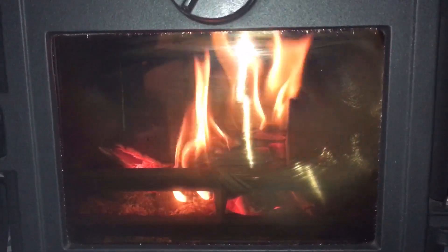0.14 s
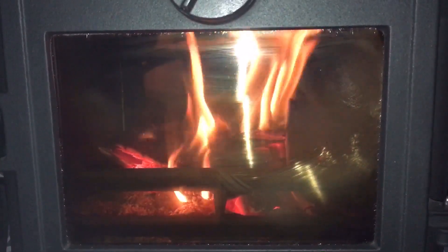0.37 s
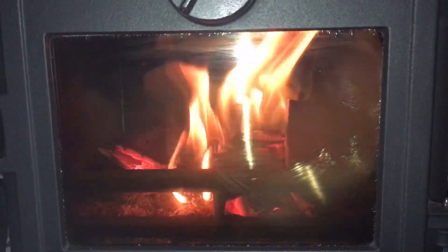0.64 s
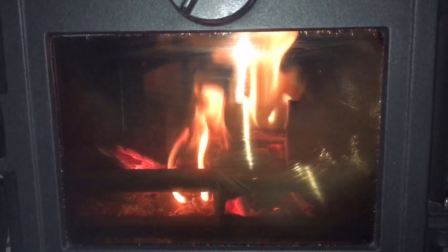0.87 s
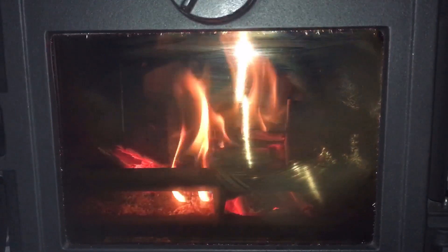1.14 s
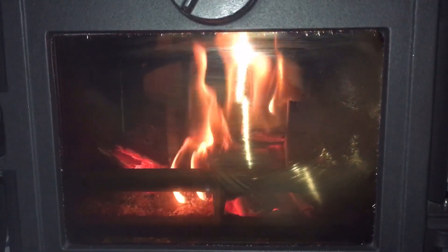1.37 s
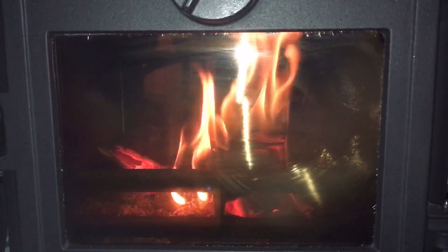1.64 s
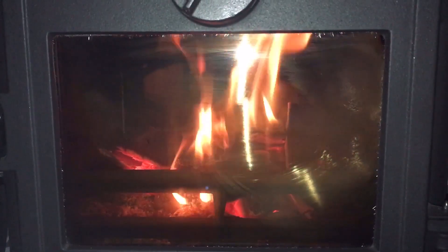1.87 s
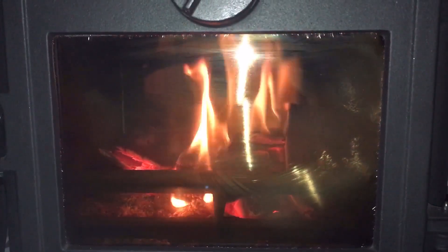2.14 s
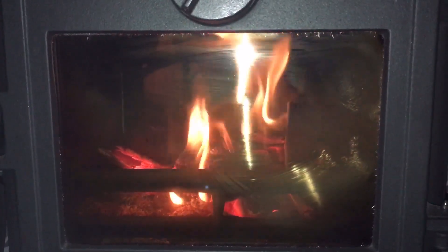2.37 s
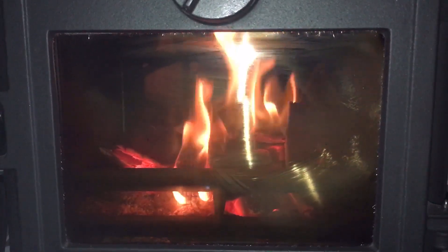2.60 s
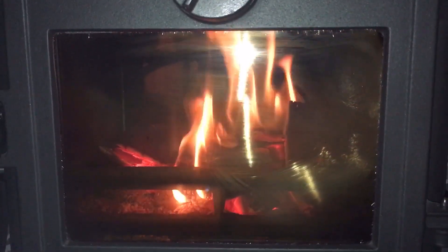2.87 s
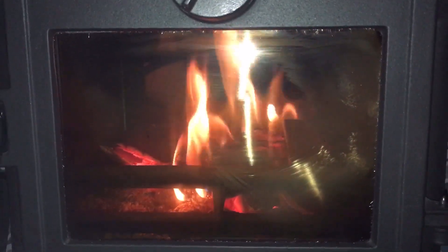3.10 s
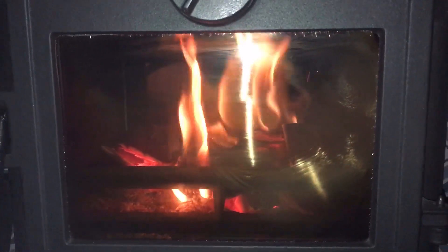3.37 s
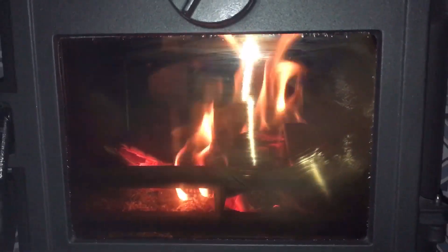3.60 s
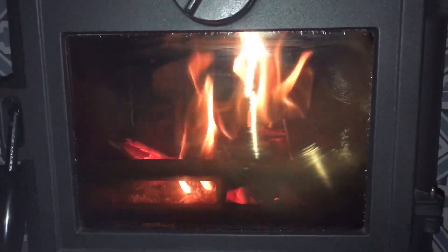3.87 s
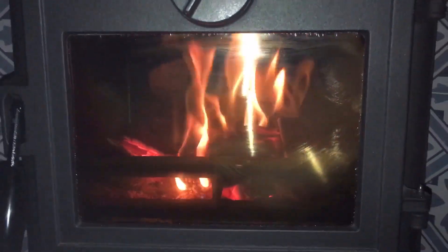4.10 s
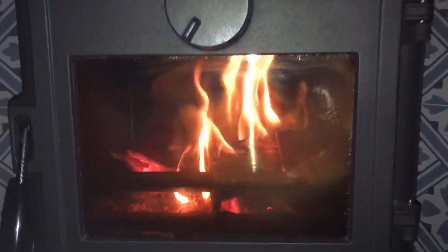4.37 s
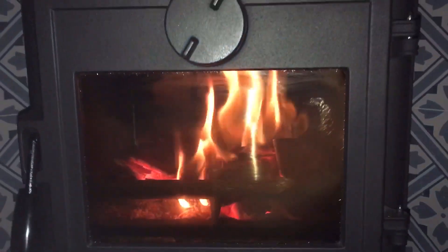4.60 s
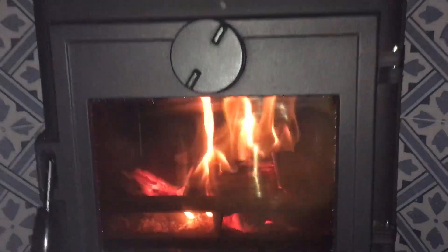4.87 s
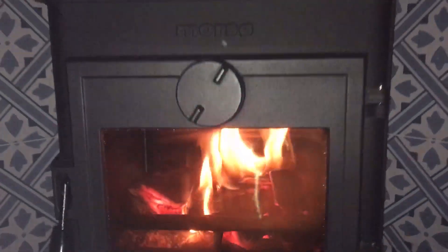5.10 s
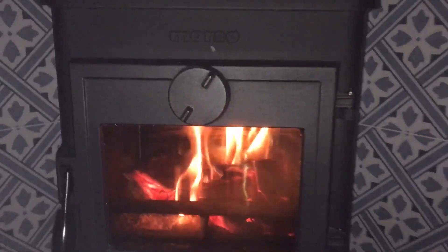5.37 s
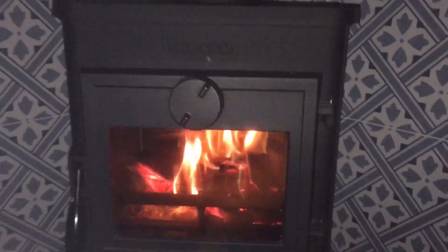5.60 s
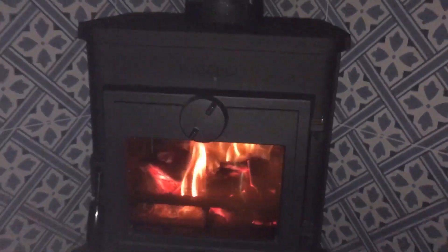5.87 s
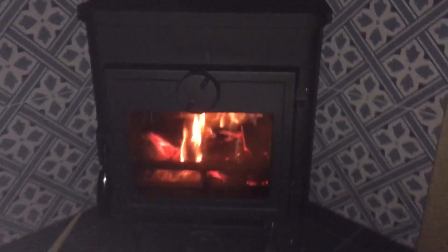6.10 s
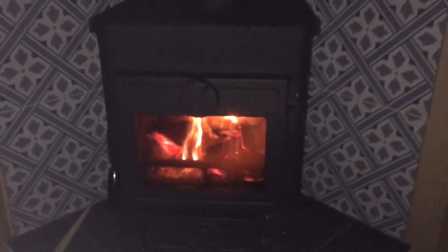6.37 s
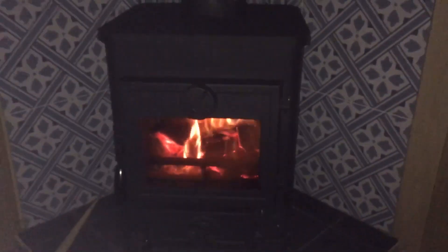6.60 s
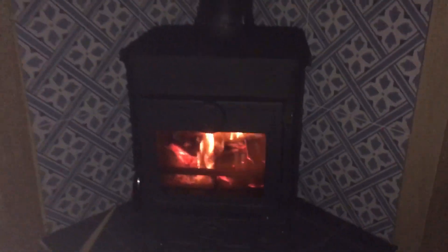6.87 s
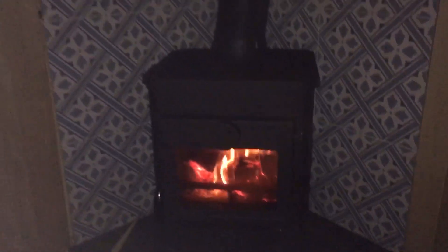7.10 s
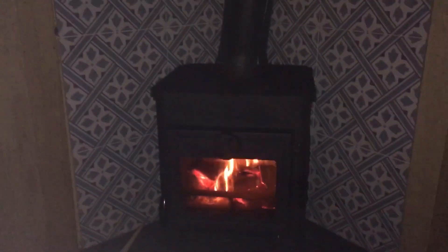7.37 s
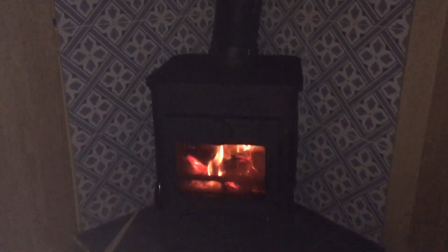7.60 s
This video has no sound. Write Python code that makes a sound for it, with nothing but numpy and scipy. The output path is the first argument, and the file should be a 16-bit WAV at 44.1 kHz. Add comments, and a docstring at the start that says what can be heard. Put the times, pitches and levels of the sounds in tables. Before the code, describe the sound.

Claws drag over cloth on a hollow floor in uneven strokes, with dull thumps, faint ticks, one stove crack and a small click.

```python
"""In a quiet room, near a burning iron stove, a dog paws at its bedding.
Each stroke drags claws over cloth and shakes the hollow floor: random clicks ring resonances.
Some strokes bring a thump, a soft push on floor and bed. Stove and claws tick faintly (short noise
sprays); the stove cracks once; later something small clicks (rough contacts ringing a few modes).
Draught rumble, a soft roar and microphone hiss, all shaped noise, lie below."""
import sys
import numpy as np
from scipy import signal
from scipy.fft import rfft, irfft
from scipy.io import wavfile
from scipy.ndimage import uniform_filter1d

SR = 44100
rng = np.random.default_rng(int(sys.argv[2]) if len(sys.argv) > 2 else 0)


def master_out(mix):
    """Clip the mix to full scale and print it as 16-bit PCM to the path in sys.argv[1]."""
    frames = np.transpose(np.atleast_2d(mix))
    ceiling = np.clip(frames, -1, 1)
    pcm = np.round(ceiling * 32767).astype(np.int16)
    wavfile.write(sys.argv[1], SR, pcm)


def gain_from_db(level_db):
    """Convert decibel levels to linear amplitude factors (20 dB per decade)."""
    decades = np.asarray(level_db, float) / 20
    return 10 ** decades


N = 340893
STEP = 32   # paw levels are worked out once every 32 samples


def rms_one(x):
    """Scale to rms 1."""
    return x / np.sqrt(np.mean(x ** 2) + 1e-20)


def coloured(points):
    """Noise with the given spectrum, rows of (frequency [Hz], level [dB per Hz]); rms 1."""
    hz, db = np.transpose(points)
    bins = np.linspace(1, SR / 2, N // 2 + 1)
    shape = gain_from_db(np.interp(np.log(bins), np.log(hz), db, left=-60))
    return rms_one(irfft(rfft(rng.standard_normal(N)) * shape, N))


def drift(rate_hz):
    """Slow random wandering: noise smoothed twice; rms 1."""
    r = np.exp(-2 * np.pi * rate_hz / SR)
    noise = rng.standard_normal(N + SR)
    return rms_one(signal.lfilter([1], [1, -2 * r, r * r], noise)[SR:])   # skip the filter's start


def together(a_db, b_db):
    """Gain of two unrelated levels heard at once: their powers add."""
    return np.hypot(gain_from_db(a_db), gain_from_db(b_db))


def band(x, edges_hz):
    """Keep only the band between two frequencies."""
    return signal.sosfilt(signal.butter(2, edges_hz, "band", fs=SR, output="sos"), x)


def resonate(x, peaks):
    """Parallel resonances, signs alternating; rows of (frequency [Hz], width [Hz], level [dB])."""
    out = 0
    for k, (hz, width, db) in enumerate(peaks):
        r = np.exp(-np.pi * width / SR)
        a = [1, -2 * r * np.cos(2 * np.pi * hz / SR), r * r]
        b = [(1 - r * r) / 2, 0, (r * r - 1) / 2]
        out = out + (-1) ** k * gain_from_db(db) * signal.lfilter(b, a, x)
    return out


def placed(hits):
    """One impulse for each row of (time [s], level [dB])."""
    out = np.full(N, 1e-18)
    for s, db in hits:
        out[round(s * SR)] = gain_from_db(db)
    return out


def held(start, length, db, swell_db, rise, fall):
    """Power of gestures, a row each: a steady climb, a hold that may swell, a steady fall."""
    t = np.arange(0, N, STEP) / SR - np.c_[start]
    length = np.c_[length]
    level_db = np.c_[db] + np.c_[swell_db] * np.clip(t / length, 0, 1)
    return gain_from_db(2 * (level_db + rise * np.minimum(t, 0) - fall * np.maximum(t - length, 0)))


def every_sample(coarse):
    """Fill in a curve to one value per sample."""
    return np.interp(np.arange(N) / STEP, np.arange(len(coarse)), coarse)


def level_of(*powers):
    """Summed power of all gestures in dB, one value per sample."""
    total = sum(p.sum(axis=0) for p in powers)
    return every_sample(10 * np.log10(total + 1e-12))


# long strokes: (paw lands [s], length [s], claw rasp on landing [dB], swell until it lifts [dB],
#                weight on floor above rasp [dB], rasp tilt [dB per octave])
LONG_STROKES = [(0.0, .2, -53.5, -1.5, 7, -0.3), (0.541, 0.19, -52.5, -4.5, 7, 0.6),
                (1.519, 0.16, -50, -1.5, 2.5, 1.7), (2.11, 0.21, -46.5, -7, 3, 1.3),
                (2.806, 0.16, -50, -4, 7, 2.5), (3.387, 0.19, -56, 11, 10, 1.5),
                (4.078, 0.067, -51.5, 0, 9, 2.2), (5.119, 0.14, -60, 16.5, -1, -3.5),
                (5.638, 0.13, -49, -0.5, -1.5, -1.2), (7.094, 0.2, -57.5, 5.5, -1.5, -4.5),
                (7.661, 0.11, -52.5, 7.5, 3.5, -1.5)]
# brief digs of the claws, and a low thud just before the small click:
# (time [s], length [s], rasp [dB], drag above rasp [dB], weight above rasp [dB],
#  rasp tilt [dB per octave])
BRIEF_DIGS = [(0.146, 0.0089, -66, 21.5, 4, 3), (0.389, 0.023, -61, 4, -4, 2.5),
              (.44, 0.018, -65, 11, -6, -1), (0.617, 0.033, -47, 7, 5, -4.5),
              (0.854, 0.019, -56, 4, -1.5, 0), (0.905, 0.012, -60.5, 8.5, 9, -5.5),
              (1.624, 0.066, -47, -2, -9, 1.5), (1.94, 0.013, -61, 9.5, -9, -2),
              (2.86, 0.023, -47, 2, 5, 0), (3.537, 0.012, -49, 13.5, 17, -4),
              (3.848, 0.021, -62.5, 8, 1, -3), (4.052, 0.021, -53, 5.5, -9, 3.5),
              (4.168, 0.0057, -42, 4, 13, 3), (5.436, 0.042, -51, -2, -10, -3.3),
              (5.745, .015, -55.5, 10.5, 12, -7), (6.919, 0.025, -74, 15.5, 15, 1),
              (7.128, 0.015, -55.5, 4, 8.5, -8), (7.259, 0.033, -47, -5, -21, 0.8)]
# a paw set down or shifted without claws: (time [s], drag [dB], weight [dB])
PAW_SHIFTS = [(2.02, -61, -49), (2.61, -60.5, -61), (2.68, -57.5, -55), (3.1, -85, -49.5), (3.25, -61, -59),
              (4.329, -52.5, -47.5), (4.408, -52, -44), (4.93, -55.5, -75), (5.0, -57, -57),
              (7.53, -54, -72)]
DRAG_ABOVE_RASP_DB = 7   # in long strokes
# how fast each layer comes and goes: (rise [dB per s], fall [dB per s])
RASP_SLOPES, DRAG_SLOPES, WEIGHT_SLOPES = (334, 219), (306, 201), (300, 156)
DIG_FASTER_RISE, DIG_FASTER_FALL = 6.8, 1.27   # times those slopes
SHIFT_S, SHIFT_SLOPES = 0.0067, (360, 340)


def paw():
    """Levels of rasp, drag and weight, and tilt of the rasp, from strokes, digs, thud and shifts."""
    s, length, db, swell_db, weight_db, tilt_db = np.transpose(LONG_STROKES)
    dig_s, dig_length, dig_db, dig_drag_db, dig_weight_db, dig_tilt_db = np.transpose(BRIEF_DIGS)
    shift_s, shift_drag_db, shift_weight_db = np.transpose(PAW_SHIFTS)

    def stroke(rel_db, slopes):
        return held(s, length, db + rel_db, swell_db, *slopes)

    def dig(rel_db, slopes):
        rise, fall = slopes[0] * DIG_FASTER_RISE, slopes[1] * DIG_FASTER_FALL
        return held(dig_s, dig_length, dig_db + rel_db, 0 * dig_s, rise, fall)

    def shift(level_db):
        return held(shift_s, SHIFT_S + 0 * shift_s, level_db, 0 * shift_s, *SHIFT_SLOPES)

    long, brief = stroke(0, RASP_SLOPES), dig(0, RASP_SLOPES)
    # the louder gesture decides the tilt
    tilt = tilt_db @ long + dig_tilt_db @ brief
    tilt = tilt / (long.sum(axis=0) + brief.sum(axis=0) + 1e-12)
    drag = level_of(stroke(DRAG_ABOVE_RASP_DB, DRAG_SLOPES), dig(dig_drag_db, DRAG_SLOPES),
                    shift(shift_drag_db))
    weight = level_of(stroke(weight_db, WEIGHT_SLOPES), dig(dig_weight_db, WEIGHT_SLOPES),
                      shift(shift_weight_db))
    return level_of(long, brief), drag, weight, every_sample(tilt)


def catches(per_s, spread_db):
    """Claws catch and let go of threads: dense random clicks of uneven size."""
    sizes = gain_from_db(spread_db * np.minimum(rng.exponential(1, N), 4)) * rng.choice([-1, 1], N)
    return sizes * (rng.random(N) < per_s / SR) + 1e-18


def steadied(x, window_s, share):
    """Part of the noise's chance swell is evened out; rms 1."""
    swell = np.sqrt(uniform_filter1d(x ** 2, int(window_s * SR)) + 1e-12)
    return rms_one(x / swell ** share)


# resonances shaken by the paws, in floor, bed and clawed cloth: (frequency [Hz], width [Hz], level [dB])
FLOOR_PEAKS = [(76.6, 14, -3), (111, 24.2, 0), (128.2, 55.2, -8.5)]
BED_PEAKS = [(186, 25, 3), (243, 82, -3.5), (294.3, 42.7, -1), (372, 23.2, -4.5), (460.7, 9.3, -6.5),
             (556, 21, -14.5)]
RASP_PEAKS = [(625, 124, -7), (741, 22.4, -2), (809, 11.5, 4), (947, 130, -6), (1104, 49, -7.5),
              (1216, 27, -6), (1394, 103, -6.5), (1627, 62, -9.5), (1822, 81, -13), (2064, 110, -15),
              (2324, 136, -16.5), (3010, 530, -28.5)]
# spectrum of the cloth's swish and the treble hiss: (frequency [Hz], level [dB per Hz])
SWISH_SPECTRUM = [(2500, 2), (3500, 0.5), (6500, -1), (9000, -1), (16000, -2)]


def strokes(rasp_db, drag_db, weight_db, tilt, murmur_db, hiss_db):
    """One uneven drag shakes floor, bed and claws; the cloth swishes above."""
    effort = np.clip((rasp_db + 90.5) / 20, 0, 1)
    judder = effort * drift(18.4)   # the paw sticks and slips, felt in every layer
    # the swish follows half of the rasp's swing
    swish_db = -64.5 + 0.5 * (rasp_db + 49.5) + 1.1 * judder
    out = together(swish_db, hiss_db) * coloured(SWISH_SPECTRUM)
    # (resonances, gain, catches per s, judder [dB], tilt [dB per octave])
    layers = [(FLOOR_PEAKS, together(weight_db, murmur_db), 600., .8, 0),
              (BED_PEAKS, gain_from_db(drag_db), 1500., .8, 0),
              (RASP_PEAKS, gain_from_db(rasp_db), 3000., 1.2, tilt)]
    for peaks, gain, per_s, judder_db, tilt_db in layers:
        force = catches(per_s, spread_db=1.0)
        shaken = 0
        for k, peak in enumerate(peaks):
            # each resonance's strength wanders slowly at random
            octaves_up = np.log2(peak[0] / peaks[0][0])
            strength_db = 2.46 * drift(2.94) + tilt_db * octaves_up
            shaken = shaken + (-1) ** k * gain_from_db(strength_db) * resonate(force, [peak])
        # all three layers are set 3 dB below their table levels
        out = out + gain * gain_from_db(judder_db * judder - 3.0) * steadied(shaken, 0.037, 0.41)
    return out


# paw lands hard: (time [s], strength of the push [dB])
HARD_LANDINGS = [(2.865, -21), (3.549, -18.5), (3.56, -23), (4.167, -51), (4.184, -21.5)]


def thumps():
    """A soft push rings floor and bed."""
    push = signal.lfilter([1], [1, -.93], placed(HARD_LANDINGS))
    return gain_from_db(19.0) * resonate(push, FLOOR_PEAKS) + gain_from_db(8.5) * resonate(push, BED_PEAKS)


def sprays(rows, t60_s, octaves, snap_db):
    """A snap, then noise dying away, in a band about each centre; scaled to the peak level."""
    out = np.zeros(N + SR)
    half = 2 ** (octaves / 2)
    t = np.arange(int(.3 * SR)) / SR
    for s, db, hz in rows:
        force = rng.standard_normal(len(t)) * gain_from_db(-60 * t / t60_s)
        force[0] = gain_from_db(snap_db)
        spray = band(force, [hz / half, min(hz * half, .45 * SR)])
        out[round(s * SR):][:len(spray)] += gain_from_db(db) * spray / np.abs(spray).max()
    return out[:N]


# faint ticks of stove and claws: (time [s], peak level [dB], centre frequency [Hz])
FAINT_TICKS = [(.8565, -53, 11500), (.872, -56, 12500), (0.9212, -54, 7000), (0.9872, -47.5, 12000),
               (1.151, -55, 7500), (1.269, -54, 11700), (1.298, -45, 9400), (1.971, -50, 9600),
               (2.4678, -50, 14000), (2.7086, -52, 9760), (3.1188, -52, 12900), (3.7506, -45, 11000),
               (3.849, -41.5, 13600), (4.004, -50.5, 7030), (4.1699, -59, 2130), (5.0345, -54, 11900),
               (5.446, -46, 11000), (5.577, -44.5, 5450), (6.0892, -50.5, 6450), (6.4855, -51, 9250),
               (6.8604, -48, 9460), (7.1376, -53, 2370), (7.4525, -53, 13000)]


def faint_ticks():
    """Each tick is a sharp snap and a short spray over a wide band."""
    return sprays(FAINT_TICKS, t60_s=0.031, octaves=1.33, snap_db=14)


# a narrow tick just after the crack: (time [s], peak level [dB], centre frequency [Hz])
NARROW_TICK = [(6.2214, -44, 2010)]


def narrow_tick():
    """A strong snap in a narrow band, so that it has a pitch."""
    return sprays(NARROW_TICK, t60_s=.03, octaves=0.26, snap_db=32.0)


def struck(hits, modes, contact_t60_s, spray_db, spray_hz):
    """A rough, splintering contact excites the modes and is itself heard as a spray."""
    fade = gain_from_db(-60 / (contact_t60_s * SR))
    contact = signal.lfilter([1], [1, -fade], placed(hits)) * rng.standard_normal(N)
    out = gain_from_db(spray_db) * band(contact, spray_hz)
    for hz, db, t60 in modes:
        r, w = gain_from_db(-60 / (t60 * SR)), 2 * np.pi * hz / SR
        ringing = signal.lfilter([0, np.sin(w)], [1, -2 * r * np.cos(w), r * r], contact)
        out = out + gain_from_db(db - 32) * ringing   # all modes share a 32 dB cut
    return out


# the crack splits in steps: (time [s], strength [dB])
CRACK_STEPS = [(6.1675, -35), (6.169, -46), (6.174, -28.5), (6.182, -34.5), (6.194, -39.5)]
# modes of the stove plates: (frequency [Hz], relative level [dB], time to fall 60 dB [s])
STOVE_MODES = [(765, -6.5, 0.0069), (1400, 4, 0.0033), (2320, -23, 0.084), (3580, -9, 0.015),
               (5950, -9, 0.042), (7130, -13, 0.022), (9460, -8, 0.015)]


def stove_crack():
    """A few splitting steps in quick succession ring the iron plates."""
    return struck(CRACK_STEPS, STOVE_MODES, 0.039, -7.0, [700., 10500.])


# a click and its bounces: (time [s], strength [dB])
CLICK_BOUNCES = [(6.934, -36.5), (6.945, -42), (6.953, -67)]
# modes of a small hard object: (frequency [Hz], relative level [dB], time to fall 60 dB [s])
CLICK_MODES = [(748, -3, .04), (1150, -3, 0.045), (1510, 0, 0.02), (2230, 1.5, 0.018), (3010, 0, 0.028),
               (3840, -7, .03), (5310, -4, 0.05), (6200, -11, .015)]


def small_click():
    """A small hard object clicks and bounces, ringing its own modes."""
    return struck(CLICK_BOUNCES, CLICK_MODES, 0.046, 0.5, [800., 5500.])


def room(x):
    """Diffuse echoes: noise dying away, dulled by the walls."""
    t = np.arange(SR // 2) / SR
    tail = rng.standard_normal(len(t)) * gain_from_db(-60 * t / 0.3) * (t > .004)   # falls 60 dB in 0.3 s
    tail = signal.sosfilt(signal.butter(1, 5800, fs=SR, output="sos"), tail)
    return signal.fftconvolve(x, tail / np.linalg.norm(tail))[:N]


# background levels, with extra treble swish in the stroke at 7.12 s:
# (time [s], low rumble [dB], soft roar before its 3 dB cut [dB],
#  murmur of the floor before its 3 dB cut [dB], treble hiss [dB])
BACKGROUND_LEVELS = [(0.0, -60, -78, -70, -74), (.9, -63, -70, -64, -77), (1.4, -61.5, -73, -64, -75),
                     (2.5, -68.5, -73.5, -62.5, -74.5), (3.2, -64, -73.5, -56.5, -72.5),
                     (3.8, -59.5, -75, -58, -76), (4.7, -64.5, -71, -70, -71.5),
                     (5.4, -67.5, -68, -63, -73.5), (6.0, -67, -73, -66.5, -71.5),
                     (6.5, -77, -70.5, -75.5, -72.5), (6.95, -78, -66, -68, -71),
                     (7.12, -75, -64, -72, -61.5), (7.4, -78, -66.5, -70, -71),
                     (7.73, -66, -58.5, -63, -62.5)]


def background_levels():
    """Levels of rumble, roar, murmur and hiss, gliding from row to row."""
    s, *columns = np.transpose(BACKGROUND_LEVELS)
    return [np.interp(np.arange(N) / SR, s, c) for c in columns]


def draught_rumble(rumble_db, weight_db):
    """Deep wavering noise; the strokes also stir this deepest bass."""
    gain = together(rumble_db, weight_db - 20.5) * gain_from_db(0.81 * drift(7.6))
    return gain * coloured([(28, -4), (45, -5.5), (60, 10.0), (75, 2.0), (100, -42)])


# spectrum of the soft roar: (frequency [Hz], level [dB per Hz])
ROAR_SPECTRUM = [(120, -5), (250, -4.5), (500, -5.5), (700, -8), (1200, -11), (2500, -24.5)]


def soft_roar(roar_db):
    """Fluttering noise of the low and middle range."""
    return gain_from_db(roar_db + 1.8 * drift(18.0) - 3.0) * coloured(ROAR_SPECTRUM)


# spectrum of room tone and hiss: (frequency [Hz], level [dB per Hz])
QUIET_SPECTRUM = [(40, 7.5), (70, -1.5), (110, -2.5), (250, -7.5), (1000, -17), (2500, -21), (6000, -50),
                  (16000, -23)]


def quiet():
    """Steady room tone and microphone hiss."""
    return gain_from_db(-67.5) * coloured(QUIET_SPECTRUM)


def scene():
    """Paws, ticks, crack and click in the room, over draught, roar and hiss."""
    rasp_db, drag_db, weight_db, tilt = paw()
    rumble_db, roar_db, murmur_db, hiss_db = background_levels()
    paws = strokes(rasp_db, drag_db, weight_db, tilt, murmur_db, hiss_db)
    sharp = thumps() + faint_ticks() + narrow_tick() + stove_crack() + small_click()
    echoes = room(gain_from_db(-8) * sharp)
    background = draught_rumble(rumble_db, weight_db) + soft_roar(roar_db) + quiet()
    return (paws + sharp + echoes + background)[None]


def band_limit(x):
    """A steep low-pass at the top of the band."""
    return signal.sosfilt(signal.butter(12, 15850, fs=SR, output="sos"), x)


# dips in the microphone's response: (frequency [Hz], width [Hz], level [dB])
MICROPHONE_DIPS = [(4840, 840, -4), (10420, 240, -10.5)]


def record(dry):
    """The microphone drops the deepest bass and has two dips in the treble."""
    heard = signal.sosfilt(signal.butter(2, 35., "high", fs=SR, output="sos"), dry)
    for hz, width, db in MICROPHONE_DIPS:
        heard = heard - (1 - gain_from_db(db)) * resonate(heard, [(hz, width, 0)])
    return band_limit(heard)


dry = scene()
out = record(dry)
master_out(out)
```